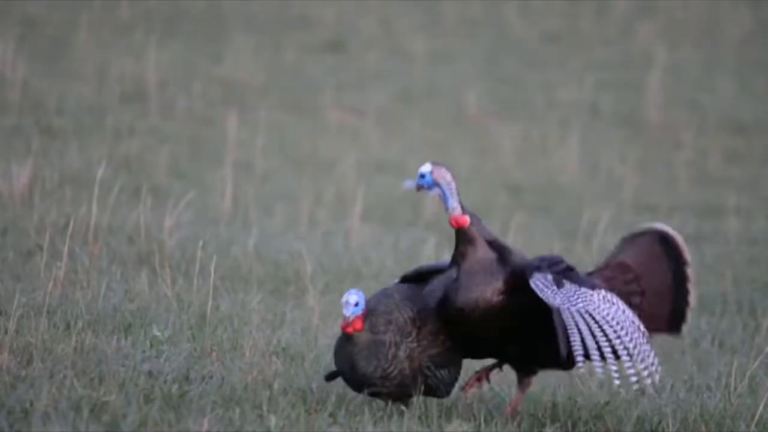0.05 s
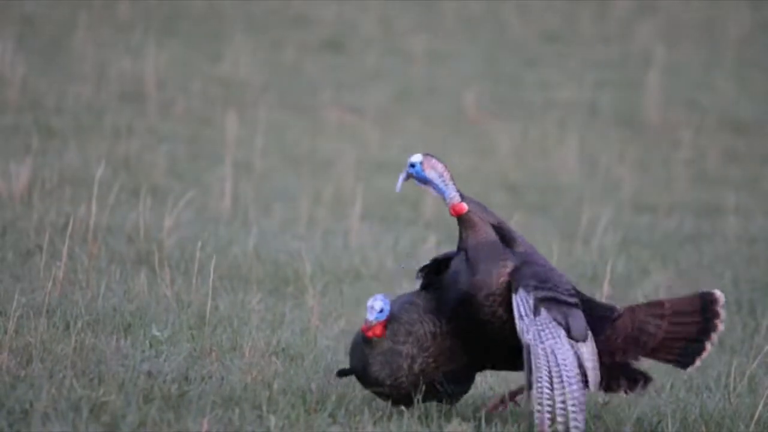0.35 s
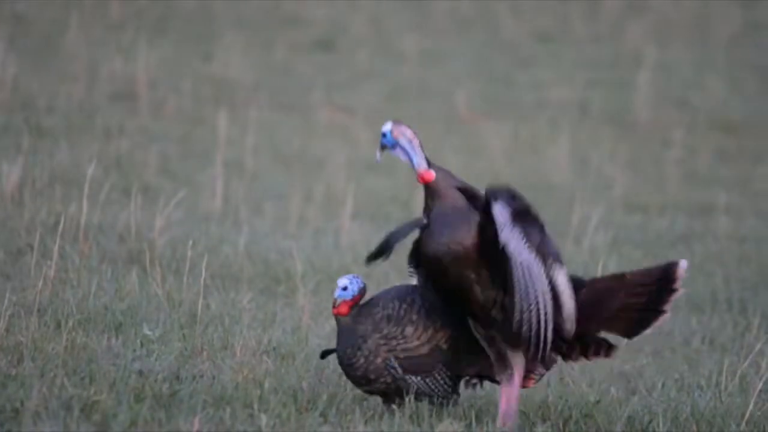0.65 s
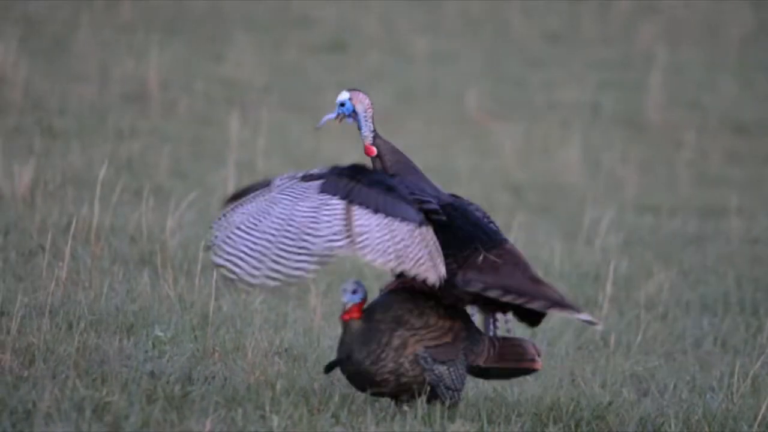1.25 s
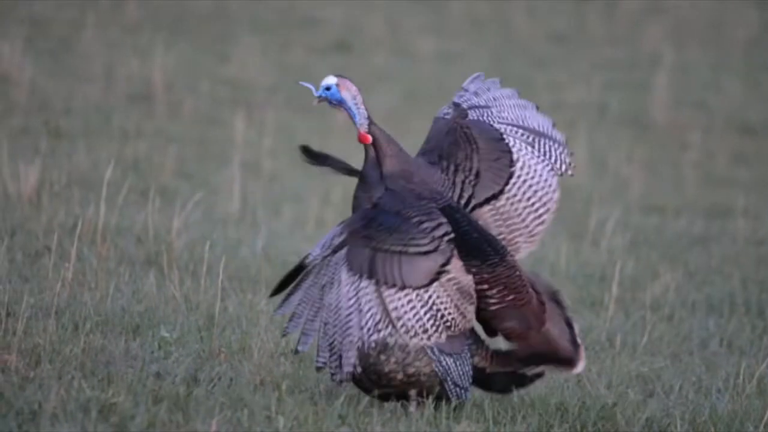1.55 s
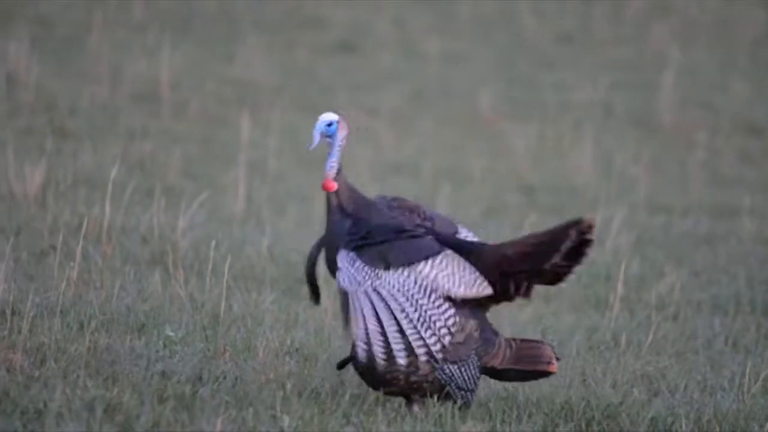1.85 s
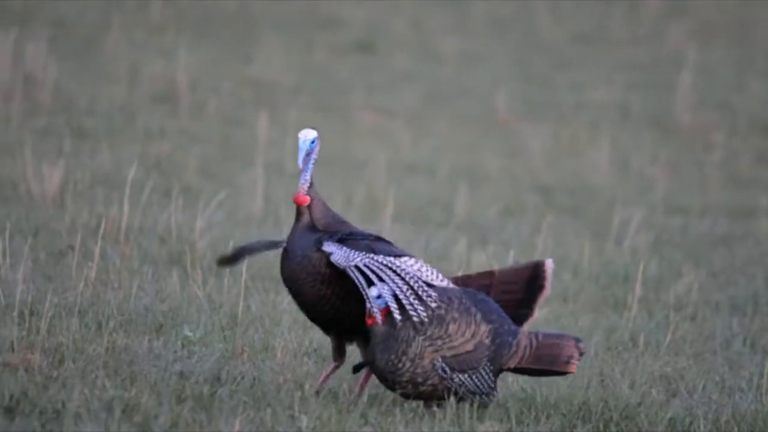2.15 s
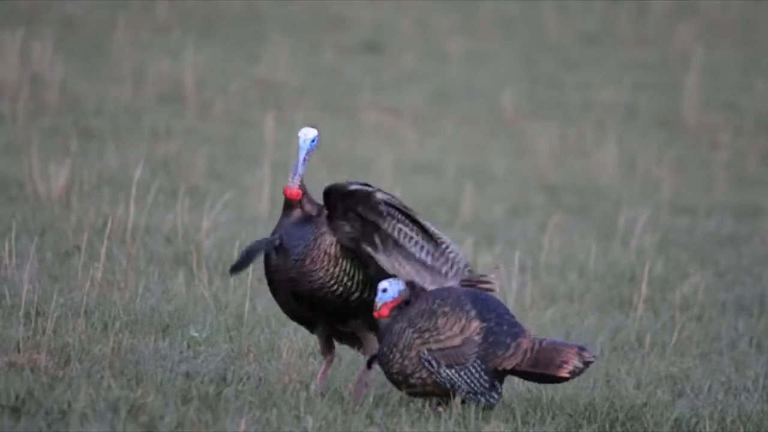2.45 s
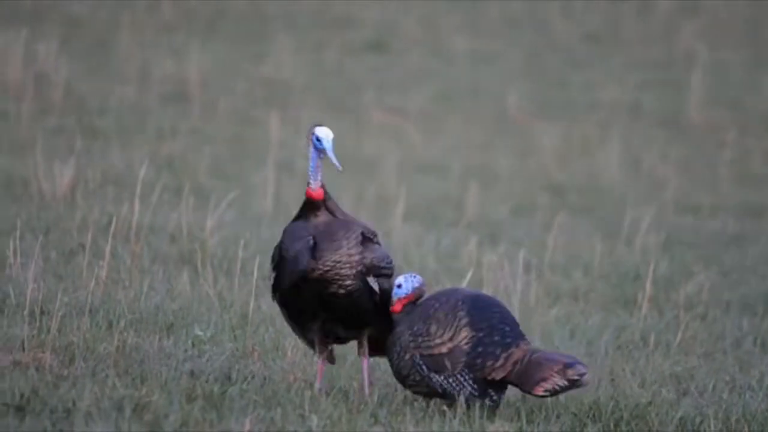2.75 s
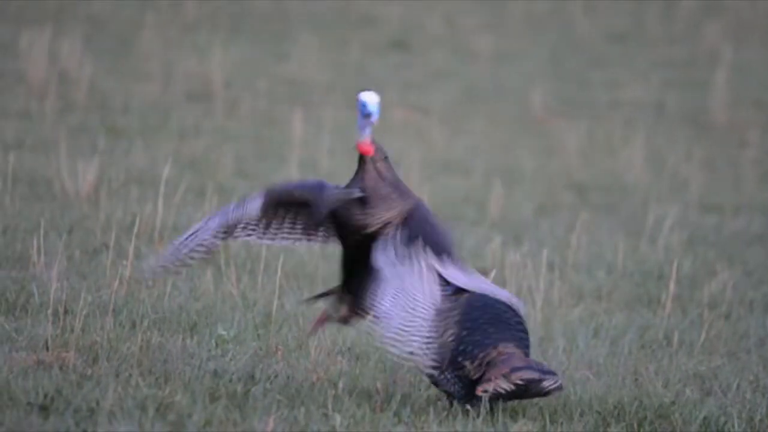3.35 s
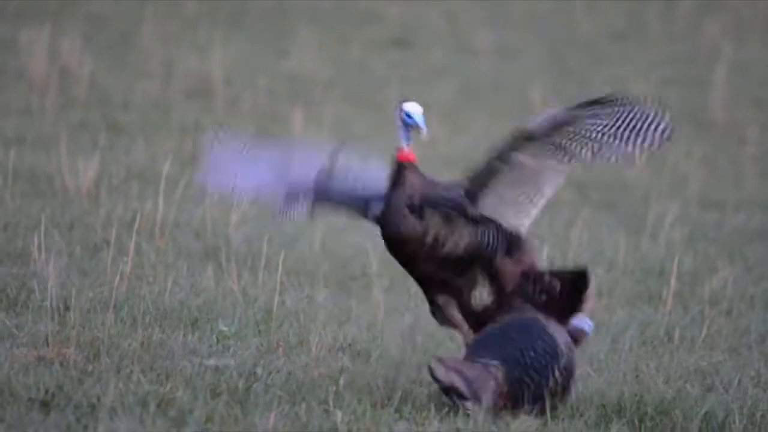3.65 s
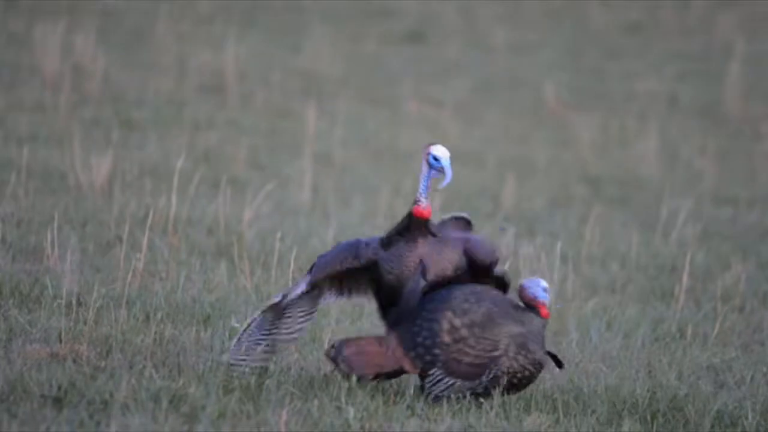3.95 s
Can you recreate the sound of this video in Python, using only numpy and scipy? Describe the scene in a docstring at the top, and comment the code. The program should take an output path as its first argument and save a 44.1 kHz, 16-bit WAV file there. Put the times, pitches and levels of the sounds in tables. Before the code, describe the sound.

Wing flaps, feather rustles and thumps from scuffling turkeys, with distant birdsong outdoors.

```python
"""A turkey scuffles with another in an open field. At first songbirds chip and fowl yelp from its
echoing edge, over a low outdoor rumble. From 0.8 s to about 2 s comes a bout of flapping: impacts set
wing and body vibrating, stiff quills clack, and feathers scrape by friction. A thin, far whistle
hangs in the lull. At 3.4 s a wing whips the air and opens a second bout, close and hard, after which
the distant birdsong swells."""
import sys
import numpy as np
from scipy import signal
from scipy.fft import rfft, irfft
from scipy.io import wavfile
from scipy.ndimage import uniform_filter1d

SR = 44100
rng = np.random.default_rng(int(sys.argv[2]) if len(sys.argv) > 2 else 0)


def wav_record(signal):
    """Record a signal, one row per channel, as 16-bit PCM in the file named by sys.argv[1]."""
    frames = np.transpose(np.atleast_2d(signal))
    bounded = np.clip(frames, -1, 1)
    # unit amplitude maps onto the largest positive 16-bit level
    quanta = np.round(bounded * 32767).astype(np.int16)
    wavfile.write(sys.argv[1], SR, quanta)


N = 176400
T = np.arange(N) / SR

# Spectra of the background. Each row: frequency in Hz, relative level in dB.
OPEN_AIR_SPECTRUM = [(12, -42), (20, -0.5), (37, -10.5), (70, -3), (95, -1.5), (120, -5.5), (216, -12),
                     (330, -15.5), (590, -20.5), (700, -17), (1000, -14.5), (1570, -21), (2820, -22.5),
                     (3630, -28), (4060, -30.5), (5080, -33), (13500, -34.5), (16000, -36)]
RUMBLE_SPECTRUM = [(35, -26.5), (65, -7.5), (90, 2.5), (115, -6.5), (180, -20.5), (400, -48.5)]
CHORUS_SPECTRUM = [(1200, -15), (2100, 1.5), (3000, 3), (3800, 0.5), (4500, -16)]
SIDE_HISS_SPECTRUM = [(60, -13), (200, 2), (700, 6.5), (2000, -15), (4000, 2), (15000, 5)]
# Envelopes of the sustained sounds. Each row: time in seconds, level in dB.
RUMBLE_ENVELOPE = [(0, -44), (.6, -51), (1.2, -51), (2, -53), (4, -49)]
CHORUS_ENVELOPE = [(0, -58.5), (2.2, -58), (3.2, -60.5), (3.65, -53), (3.85, -52), (4, -48.5)]
THIN_WHISTLE_ENVELOPE = [(1.9, -82), (2.12, -59.5), (2.35, -54.5), (2.7, -52), (3.1, -72)]

# A songbird's falling chips. Each row: start in seconds, relative level in dB.
CHIPS = [(.132, -48.5), (.369, -46), (.602, -45.5), (.834, -46), (1.061, -47), (1.297, -45), (1.425, -48.5),
         (1.955, -48), (2.212, -44), (2.478, -51.5)]
# The filter that dulls a chip's high start. Each row: frequency in Hz, relative gain in dB.
CHIP_THROAT = [(2000, 1.5), (2900, -2), (3500, 0.5), (4000, -2.5), (4800, -6)]
# Gliding notes: the whistles of songbirds, and the soft whines and far gobbling of fowl.
# Each row: start in seconds, length in seconds, first, middle and last pitch in Hz, level in dB.
WHISTLES = [(.793, 0.032, 3410, 3430, 3480, -42.5), (2.36, 0.062, 2955, 2760, 2540, -52),
            (2.454, 0.042, 2913, 2725, 2500, -48.5), (2.564, 0.073, 2660, 3050, 3550, -51),
            (2.651, 0.1, 3850, 3560, 3640, -53), (2.986, 0.048, 2807, 2620, 2240, -50),
            (3.249, 0.0414, 2680, 2840, 3130, -52.5), (3.584, 0.056, 2520, 2235, 2190, -45),
            (3.692, 0.03, 3290, 3090, 2820, -39), (3.747, 0.0324, 2640, 2800, 2910, -39.5),
            (3.758, 0.099, 2950, 2925, 2890, -46.5), (3.799, 0.0209, 3270, 3580, 3770, -33.5),
            (3.812, 0.02, 3670, 3917, 4040, -39), (3.876, 0.055, 5170, 5390, 5450, -57),
            (3.892, 0.054, 2640, 2236, 1900, -40)]
YELPS = [(0.279, 0.02, 1190, 1050, 900, -50), (0.386, 0.022, 683, 757, 780, -44),
         (0.448, 0.013, 644, 740, 1000, -41), (0.501, 0.012, 690, 755, 800, -43.5),
         (0.545, 0.025, 725, 742, 740, -48), (0.68, 0.072, 1405, 1270, 1200, -46.5),
         (1.034, 0.056, 1264, 1010, 840, -43.5), (1.081, 0.041, 1450, 1343, 1290, -39.5),
         (1.444, 0.056, 1250, 942, 910, -46), (1.496, 0.024, 1210, 1275, 1340, -44.5),
         (1.649, 0.016, 650, 735, 790, -41), (1.692, 0.021, 725, 775, 760, -45),
         (1.727, 0.035, 740, 677, 684, -42), (2.987, 0.016, 955, 990, 960, -41),
         (3.072, 0.0099, 1050, 1104, 1120, -34), (3.129, 0.01, 1110, 1070, 1030, -37.5),
         (3.16, 0.01, 1070, 1090, 1080, -36), (3.178, 0.024, 900, 1007, 990, -35),
         (3.802, 0.012, 1490, 1460, 1400, -42.5)]
# Harmonics of one nasal honk. Each row: multiple of the fundamental, level in dB.
HONK_PARTIALS = [(1, -47.5), (2, -46.5), (4, -48.5)]

# Spectra of the mid-range clack and rustle (cut off steeply above about 3.7 kHz), of the fine barbs
# and of the air pushed by a wing. Each row: frequency in Hz, relative level in dB.
CLACK_MID_SPECTRUM = [(150, -13), (450, -10.5), (700, -20.5), (1200, -9.5), (1900, 0), (2700, 3), (3550, 1),
                      (4000, -23), (4600, -13.5), (5200, -24.5), (7500, -18), (15000, -58)]
BARB_SPECTRUM = [(1500, -31), (3500, 6), (4400, 5), (5400, 1), (7000, -3), (8500, -3), (11500, -6.5),
                 (14000, -4.5), (15500, -21), (16500, -11)]
PUFF_SPECTRUM = [(40, -16.5), (120, 0), (300, 3), (500, -5), (640, -20), (1500, -43)]
# Feathers sliding past each other. Each row: peak time, rise and fall time constants in seconds,
# mid-range level in dB, barb and air levels in dB relative to the mid-range.
SWEEPS = [(.07, 0.024, 0.015, -55, -11, 12), (.187, 0.03, 0.0085, -51, -14, -1),
          (.232, .008, 0.023, -46.5, -10, -5), (.835, 0.019, 0.05, -43.5, -11, 2.5),
          (.972, 0.013, 0.025, -43, -21, 6.5), (1.026, 0.02, 0.008, -37.5, -1.5, -1),
          (1.128, 0.031, 0.035, -42, -20, 5), (1.219, 0.011, 0.014, -33, -37, 0),
          (1.573, 0.026, 0.036, -41, -0.5, 3.5), (1.68, 0.011, .02, -48.5, -5, 10),
          (1.714, 0.0037, 0.0052, -32.5, -12, -11), (1.738, 0.0088, 0.0053, -36, -13, -8),
          (1.827, 0.051, 0.04, -41, -14, 1.5), (1.948, 0.0064, 0.011, -40.5, -5, -9),
          (2.03, 0.062, 0.037, -53.5, -2, -3.5), (2.177, 0.017, 0.0058, -47, -11, -18),
          (3.391, 0.0064, 0.0049, -30, -13, 7.5), (3.405, 0.0098, 0.008, -17.5, -4.5, -6),
          (3.416, 0.0035, 0.0033, -24.5, 1, -3.5), (3.44, 0.032, 0.023, -36.5, -4, -6),
          (3.47, 0.013, 0.021, -40.5, -3, -2), (3.575, .005, 0.055, -45, -26, 6),
          (3.669, 0.011, 0.044, -42, -25, 4.5)]
# Collisions of quills. Each row: start in seconds, relative mid-range level in dB,
# barb level in dB relative to the mid-range, pitch of the quill in Hz.
CLACKS = [(0.063, -35, -0.5, 2780), (0.081, -31, -21, 2200), (0.8246, -17.5, -25, 2260),
          (0.83, -20.5, -20, 2000), (0.856, -23.5, -18, 1850), (0.8708, -26, -3, 4700),
          (.972, -28, -9, 1950), (1.032, -40, 4, 3000), (1.124, -34, -18, 2400), (1.1335, -31, -20, 2100),
          (1.164, -26.5, -22, 2460), (1.209, -22.5, -28, 2600), (1.217, -27, -30, 2080),
          (1.221, -30, -30, 2900), (1.244, -24, -17, 3130), (1.3024, -28, -25, 2730),
          (1.306, -24.5, -28, 2070), (1.312, -29.5, -21, 2930), (1.4816, -26, -29, 2750),
          (1.5483, -26, 2.5, 2980), (1.5663, -29, -4, 4700), (1.572, -22.5, -5.5, 3380),
          (1.584, -26, -17, 2900), (1.712, -24, -14, 2860), (1.7154, -27, -15, 2600),
          (1.767, -32, -21, 2480), (1.794, -24, -18, 2550), (1.819, -30, -22, 2500),
          (1.8313, -24, -19, 3120), (1.9414, -23, -17, 2980), (1.9507, -20, -18, 2270),
          (2.0361, -26.5, -27, 2050), (2.416, -30.5, -24, 3200), (3.3976, -13.5, -3, 2130),
          (3.399, -7, -6, 2450), (3.4036, -4.5, -3.5, 3580), (3.4054, -7, -8, 2920),
          (3.4072, -4.5, -3.5, 2830), (3.4222, -27, 4, 3000), (3.481, -12, -8, 2240),
          (3.4847, -17.5, -8, 1600), (3.558, -9.5, -12, 2250), (3.5609, -13.5, -8, 1680),
          (3.581, -28, -22, 2620), (3.658, -11, -7.5, 3530)]
# Blows of a wing on a body. Each row: start in seconds, wing level in dB, wing pitch in Hz,
# wing decay time in seconds, body level in dB.
WING_BLOWS = [(.079, -28, 318, 0.0031, -52), (.813, -23.5, 298, 0.0038, -50),
              (.857, -13.5, 144, 0.0083, -46), (0.973, -17.5, 236, 0.0049, -51),
              (0.9946, -23.5, 212, 0.0094, -49), (1.083, -31.5, 232, 0.0098, -55),
              (1.1147, -18.5, 296, 0.0021, -51), (1.1987, -24.5, 242, 0.0063, -62),
              (1.2136, -14.5, 245, 0.0044, -49), (1.304, -25, 290, 0.0051, -54),
              (1.596, -30, 306, 0.0031, -50), (1.766, -23.5, 354, 0.0029, -50),
              (1.8039, -32, 261, 0.007, -40), (1.8427, -27, 270, 0.0073, -42),
              (1.973, -32.5, 72.7, 0.043, -31), (2.081, -33.5, 69.6, 0.024, -53),
              (3.401, -31, 290, 0.011, -18), (3.4818, -8.5, 257, 0.0059, -15),
              (3.5586, -9.5, 201, 0.0041, -7), (3.6579, -4.5, 247, 0.0034, -16.5),
              (3.6836, -25, 336, 0.0038, -43)]


def amp(db):
    """Amplitude grows tenfold for every 20 dB."""
    return 10 ** (np.asarray(db) / 20)


def colour(x, points):
    """A minimum-phase filter through (Hz, dB) points, scaled to conserve the power of white noise."""
    hz, db = np.array(points, float).T
    n = len(x)
    bin_hz = np.arange(n + 1) * SR / (2 * n)
    gain = amp(np.interp(np.log(bin_hz + 1), np.log(hz), db))
    cepstrum = irfft(np.log(gain / np.sqrt(np.mean(gain ** 2))))
    cepstrum[1:n] *= 2  # folding the cepstrum makes the filter causal
    cepstrum[n + 1:] = 0
    return irfft(rfft(x, 2 * n) * np.exp(rfft(cepstrum)))[:n]


def add(out, at, sound):
    """Superposition: a sound starting at a time in seconds sums with what is already there."""
    i = max(int(at * SR), 0)
    out[i:i + len(sound)] += sound[:max(N - i, 0)]


def wander(rate_hz):
    """Smoothing random steps gives a continuous fluctuation with a spread near 1."""
    hold = int(SR / rate_hz)
    steps = np.repeat(rng.standard_normal(N // hold + 1), hold)
    return uniform_filter1d(uniform_filter1d(steps, hold), hold)[:N]


def noise(spectrum):
    """Filtered white noise takes on the spectrum of its filter."""
    return colour(rng.standard_normal(N), spectrum)


def burst(t, decay_s, spectrum):
    """Exponentially damped noise, its energy set by the envelope alone."""
    envelope = np.exp(-t / decay_s)
    x = colour(envelope * rng.standard_normal(len(t)), spectrum)
    return x * np.sqrt(np.sum(envelope ** 2) / np.sum(x ** 2))


def field():
    """Amplitude-modulated noise is heard as open air, surging rumble and a blur of far birdsong."""
    air = noise(OPEN_AIR_SPECTRUM) * amp(-47 + wander(2.2))
    rumble = noise(RUMBLE_SPECTRUM) * amp(np.interp(T, *np.array(RUMBLE_ENVELOPE).T) + 3.5 * wander(6.1))
    chorus = noise(CHORUS_SPECTRUM) * amp(np.interp(T, *np.array(CHORUS_ENVELOPE).T) + 2 * wander(26))
    return air + rumble + chorus


def thin_whistle(centre_hz=2896, half_width_hz=27):
    """Spectral broadening: a very distant held whistle arrives as a narrow, wavering band."""
    lowpass = signal.butter(2, half_width_hz, fs=SR, output="sos")
    band = signal.sosfilt(lowpass, rng.standard_normal((2, N)))
    line = np.real((band[0] + 1j * band[1]) * np.exp(2j * np.pi * centre_hz * T))
    level_db = np.interp(T, *np.array(THIN_WHISTLE_ENVELOPE).T, left=-np.inf, right=-np.inf)
    return line / np.std(line) * amp(level_db)


def tree_echo(x, build_s=0.0056, t60_s=0.63):
    """Reverberation: reflections from the trees around the field merge into a decaying tail."""
    t = T[:SR]
    tail = rng.standard_normal(SR) * amp(-60 * t / t60_s) * (1 - np.exp(-t / build_s))
    return signal.fftconvolve(x, tail / np.sqrt(np.sum(tail ** 2)))[:N]


def scatter(x, decay_s=0.013, relative_db=-11):
    """Multipath scattering: grass and foliage add many slightly longer paths to the direct one."""
    t = T[:SR // 8]
    paths = rng.standard_normal(len(t)) * np.exp(-t / decay_s)
    scattered = signal.fftconvolve(x, paths / np.sqrt(np.sum(paths ** 2)))[:N]
    return (x + amp(relative_db) * scattered) / np.hypot(1, amp(relative_db))


def note(length_s, pitches, waver, flutter_db):
    """A tone glides through three pitches; distance modulates its frequency and amplitude at random."""
    progress = np.linspace(0, 1, int(length_s * SR))
    glide_hz = np.polyval(np.polyfit([0, .5, 1], pitches, 2), progress)
    hz = glide_hz * (1 + waver * wander(274)[:len(progress)])
    envelope = np.sin(np.pi * progress) * amp(flutter_db * wander(186)[:len(progress)])
    return envelope * np.sin(2 * np.pi * np.cumsum(hz) / SR)


def birds(chip_hz=(5050, 3750, 1900), honk_at_s=.328, honk_hz=545):
    """Chips, whistles, rough yelps and a harmonic honk arrive from afar, followed by their reflections."""
    song, fowl, chips = np.zeros((3, N))
    for at, db in CHIPS:
        add(chips, at, amp(db) * note(.06, chip_hz, waver=0.013, flutter_db=5))
    chips = amp(-4) * colour(chips, CHIP_THROAT)
    for at, length, *pitches, db in WHISTLES:
        add(song, at, amp(db) * note(length, pitches, waver=0.008, flutter_db=5))
    for at, length, *pitches, db in YELPS:
        add(fowl, at, amp(db) * note(length, pitches, waver=0.0303, flutter_db=4.5))
    for multiple, db in HONK_PARTIALS:
        partial = note(0.046, np.full(3, multiple * honk_hz), waver=0.0057, flutter_db=6.5)
        add(fowl, honk_at_s, amp(db) * partial)
    calls = scatter(song + chips) + fowl
    return calls + amp(-6) * tree_echo(song) + amp(-14) * tree_echo(fowl + chips)


def barb_friction(catches_per_s=2500, spread_db=2.5, clump_hz=500, clump_db=6):
    """Stick-slip friction: barb catches on barb in tiny uneven impulses, bunched into crackles."""
    catches = (rng.random(N) < catches_per_s / SR) * np.sign(rng.standard_normal(N))
    sizes = amp(spread_db * np.minimum(rng.exponential(size=N), 3))
    clumps = amp(clump_db * np.minimum(wander(clump_hz), 1))
    crackle = catches * sizes * clumps
    return crackle / np.std(crackle)


def feather_sweeps():
    """Friction makes feathers rustle while the wing stirs the air; overlapping sweeps add in power."""
    rustle_power, barb_power, air_power = np.zeros((3, N))
    for at, rise, fall, db, barb_db, air_db in SWEEPS:
        power = (amp(db) * np.exp(-np.maximum((at - T) / rise, (T - at) / fall))) ** 2
        rustle_power += power
        barb_power += power * amp(barb_db) ** 2
        air_power += power * amp(air_db) ** 2
    rustle = colour(np.sqrt(rustle_power) * barb_friction(), CLACK_MID_SPECTRUM)
    barbs = colour(np.sqrt(barb_power) * barb_friction(), BARB_SPECTRUM)
    air = colour(np.sqrt(air_power) * rng.standard_normal(N), PUFF_SPECTRUM)
    return rustle + barbs + air


def wing_swish(at_s=3.381, length_s=.027, glide_hz=(650, 2900), half_width_hz=530):
    """Aerodynamic noise from the hardest stroke climbs in frequency as the wing tip speeds up."""
    out, progress = np.zeros(N), np.linspace(0, 1, int(length_s * SR))
    lowpass = signal.butter(2, half_width_hz, fs=SR, output="sos")
    band = signal.sosfilt(lowpass, rng.standard_normal(N))[:len(progress)]
    phase = 2 * np.pi * np.cumsum(np.interp(progress, [0, 1], glide_hz)) / SR
    envelope = amp(-23.5) * np.sin(np.pi * progress)
    add(out, at_s, envelope * band / np.std(band) * np.sin(phase))
    return out


def quill_clacks(ring_s=0.0012, snap_s=0.0009, shiver_s=0.0092):
    """Impulse response: a struck quill snaps, rings at its natural frequency and briefly shivers."""
    out, t = np.zeros(N), T[:SR // 20]
    for at, db, barb_db, hz in CLACKS:
        ring = amp(db - 2) * np.sin(2 * np.pi * hz * t) * np.exp(-t / ring_s)
        add(out, at, ring)
        for spectrum, gain in ((CLACK_MID_SPECTRUM, amp(db)), (BARB_SPECTRUM, amp(db + barb_db))):
            snap = burst(t, snap_s, spectrum)
            shiver = amp(-24) * burst(t, shiver_s, spectrum)
            add(out, at, gain * (snap + shiver))
    return amp(-4) * out


def wing_thumps(body_hz=114.4, body_decay_s=0.0065, push_s=0.00091, puff_s=0.0079, cutoff_hz=59.6):
    """Each blow excites wing and body as damped oscillators and squeezes out a puff of air."""
    out, t = np.zeros(N), T[:SR // 7]
    for at, db, hz, decay, body_db in WING_BLOWS:
        wing = amp(db) * np.sin(2 * np.pi * hz * t) * np.exp(-t / decay)
        body = amp(body_db) * np.sin(2 * np.pi * body_hz * t) * np.exp(-t / body_decay_s)
        onset = 1 - np.exp(-t / push_s)
        puff = amp(db - 13) * burst(t, puff_s, PUFF_SPECTRUM)
        add(out, at, (wing + body) * onset + puff)
    # A bird is too small to radiate well below the cutoff.
    return signal.sosfilt(signal.butter(2, cutoff_hz, "high", fs=SR, output="sos"), out)


def scene():
    """Mid-side stereo: the sources sum in the centre; only a faint hiss differs between the ears."""
    scuffle = wing_thumps() + quill_clacks() + feather_sweeps() + wing_swish()
    mid = scuffle + birds() + thin_whistle() + field()
    side = amp(-60.5) * noise(SIDE_HISS_SPECTRUM)
    return np.array([mid + side, mid - side])


def record(dry):
    """Soft saturation rounds the loudest peaks, and a steep low-pass filter cuts the highest treble."""
    ceiling, top_hz = .9, 15900
    rounded = dry / (1 + (dry / ceiling) ** 4) ** .25
    return signal.sosfilt(signal.ellip(10, .1, 80, top_hz, fs=SR, output="sos"), rounded)


dry = scene()
out = record(dry)
wav_record(out)
```